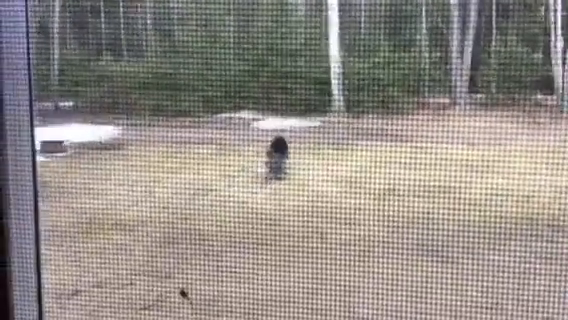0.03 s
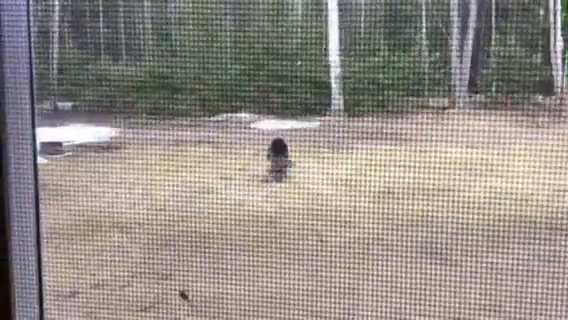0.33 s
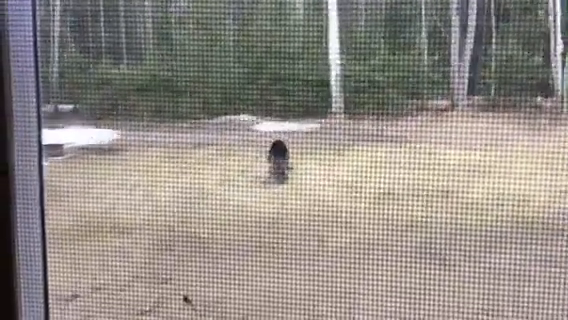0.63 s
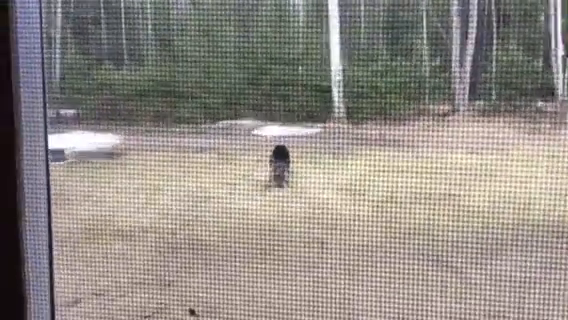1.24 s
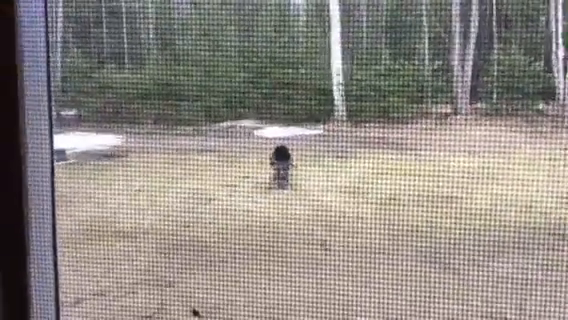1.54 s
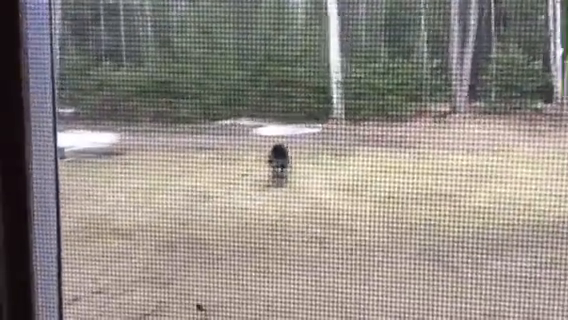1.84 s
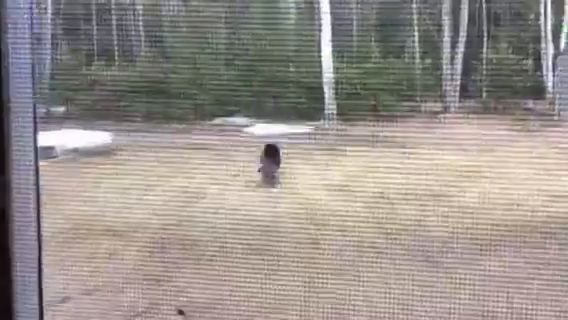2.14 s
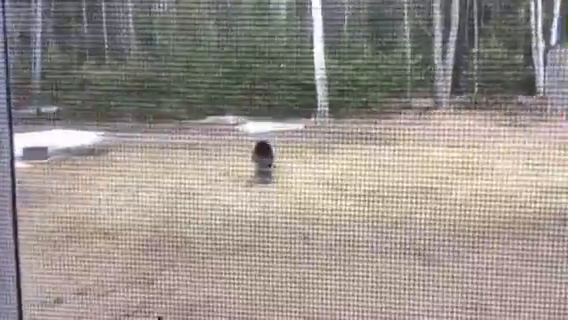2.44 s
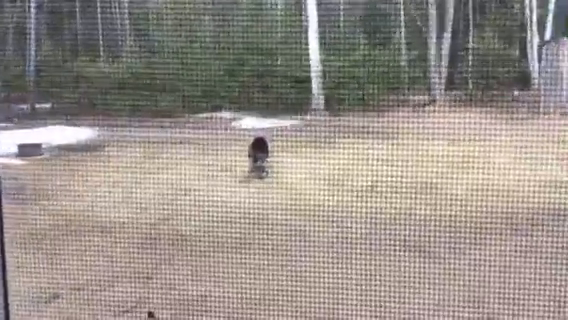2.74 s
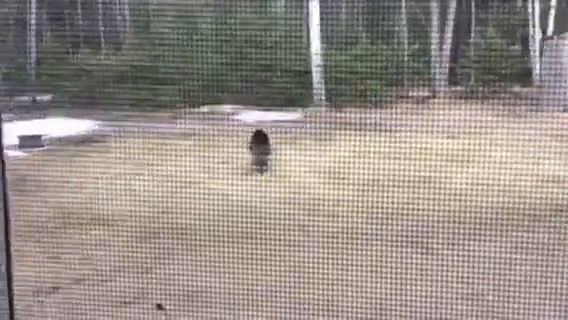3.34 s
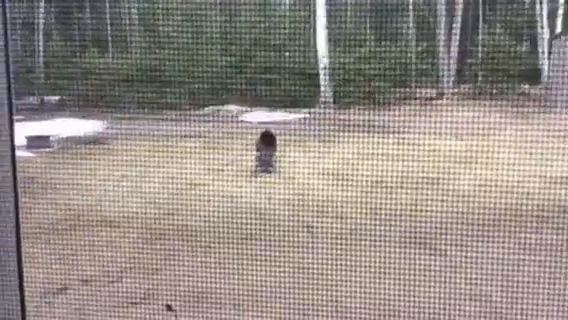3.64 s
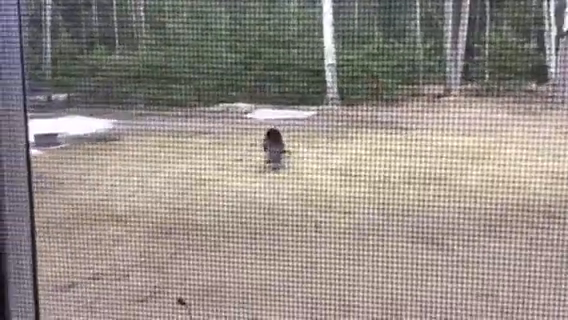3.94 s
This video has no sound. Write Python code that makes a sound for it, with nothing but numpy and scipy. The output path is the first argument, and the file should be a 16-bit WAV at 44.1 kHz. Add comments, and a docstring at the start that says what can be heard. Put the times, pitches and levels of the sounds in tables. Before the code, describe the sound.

A hollow wooden knock with a soft, rebounding thump sounds once, close by, in a quiet room. Before and after it, faint rubs, taps and plastic clicks from a hand-held microphone dot a steady appliance hum and low rumble.

```python
"""A quiet room, heard from a hand-held camera at a window screen. Throughout, an appliance hums
on the mains over low rumble, air and faint hiss. First the hand rubs on its grip, with a soft tap,
light ticks and clicks of hard plastic that ring briefly in the room. At 1.2 s something close by
is bumped: a hollow wooden knock, then a soft thump that rebounds. Afterwards a faint whirr swells
three times among more clicks and ticks, and the rubs and a tap return."""
import sys
import numpy as np
from scipy import signal
from scipy.fft import rfft, irfft, next_fast_len
from scipy.io import wavfile
from scipy.ndimage import map_coordinates

SR = 44100
rng = np.random.default_rng(int(sys.argv[2]) if len(sys.argv) > 2 else 0)


def generate_wav(signal):
    """Clip the signal to [-1, 1] and save it as 16-bit WAV at the path in sys.argv[1]."""
    frames = np.transpose(np.atleast_2d(signal))
    scaled = np.clip(frames, -1, 1) * 32767
    pcm = np.round(scaled).astype(np.int16)
    wavfile.write(sys.argv[1], SR, pcm)


N = 176400


def amp(db):
    """Decibels to gain."""
    return 10 ** (np.asarray(db) / 20)


def unit_rms(x):
    """Scale to rms 1."""
    return x / np.sqrt(np.mean(x ** 2) + 1e-20)


def log_interp(points, hz):
    """Interpolate (freq_hz, value) points on a log frequency axis."""
    freq_hz, values = np.transpose(points)
    return np.interp(np.log(hz + 1), np.log(freq_hz + 1), values)


def wobble(rate_hz):
    """Smooth random curve with knots at rate_hz."""
    knots = rng.standard_normal(int(N * rate_hz / SR) + 4)
    return map_coordinates(knots, [np.arange(N) * rate_hz / SR])


def gain_curve(points):
    """Gain per sample from (time_s, level_db) points."""
    return amp(np.interp(np.arange(N) / SR, *np.transpose(points)))


def swells(rows):
    """Gain per sample of Gaussian swells."""
    t = np.arange(N) / SR
    return sum(amp(db) * np.exp(-.5 * ((t - centre_s) / sigma_s) ** 2) for centre_s, sigma_s, db in rows)


def filtered(x, response):
    """Apply a zero-phase frequency response."""
    size = next_fast_len(N + SR // 2)
    return irfft(rfft(x, size) * response(np.fft.rfftfreq(size, 1 / SR)), size)[:N]


def noise(spectrum):
    """Coloured noise, rms 1."""
    return unit_rms(filtered(rng.standard_normal(N), lambda hz: amp(log_interp(spectrum, hz))))


def body_response(spectrum, size=4096):
    """Minimum-phase impulse response with this spectrum, energy 1."""
    cepstrum = irfft(np.log(amp(log_interp(spectrum, np.fft.rfftfreq(size, 1 / SR)))))
    cepstrum[1:size // 2] *= 2
    cepstrum[size // 2 + 1:] = 0
    response = irfft(np.exp(rfft(cepstrum)))
    return response / np.linalg.norm(response)


def add(track, start_s, sound):
    """Mix a sound in at start_s."""
    part = track[round(start_s * SR):][:len(sound)]
    part += sound[:len(part)]


# freq_hz, t60_s
ROOM_DECAY = [(150, 0.66), (1000, 0.36), (2000, 0.6), (5000, 0.36), (14000, 0.3)]
def room_tail(build_s=0.0013):
    """Random room echo, energy 1; the top treble dies first."""
    hz, t, bins = signal.stft(rng.standard_normal(SR // 2), SR, nperseg=256)
    decay = amp(-60 * t / log_interp(ROOM_DECAY, hz)[:, None])
    tail = signal.istft(bins * decay * (1 - np.exp(-t / build_s)), SR, nperseg=256)[1]
    return tail / np.linalg.norm(tail)


def contacts(rows, spectrum, contact_s, room_db, clean_share=0, rise_s=0.00026):
    """Brief pushes, part clean blow and part grit, ring the body and then the room."""
    out, t = np.zeros(N), np.arange(SR // 20) / SR
    body = body_response(spectrum)
    for start_s, level_db, *_ in rows:
        grit = rng.standard_normal(len(t)) * np.exp(-t / contact_s) * (1 - np.exp(-t / rise_s))
        push = np.sqrt(clean_share) * (t == 0) + np.sqrt(1 - clean_share) * grit / np.linalg.norm(grit)
        direct = signal.fftconvolve(push, body)
        echo = signal.fftconvolve(room_tail(), body)
        gain = amp(level_db) * np.sqrt(SR * .002)  # energy of 2 ms at level_db
        add(out, start_s, gain * direct / np.linalg.norm(direct))
        add(out, start_s, gain * amp(room_db) * echo)
    return out


def ringing(rows, modes, rise_s=0.00069):
    """Each blow excites the decaying modes of the struck part."""
    out, t = np.zeros(N), np.arange(SR // 2) / SR
    for start_s, _, ring_db in rows:
        tones = np.zeros(len(t))
        for hz, db, t60_s in modes:
            decay = amp(db + rng.normal(0, 1) - 60 * t / t60_s)
            tones += decay * np.sin(2 * np.pi * (hz * t + rng.random()))
        add(out, start_s, amp(ring_db) * tones * (1 - np.exp(-t / rise_s)))
    return out


# freq_hz, rms_db
HUM_LINES = [(57.2, -69), (99.6, -65.5), (120.0, -53), (141.2, -74), (839.6, -89.5), (959.6, -91.5),
             (1109, -91), (1428.8, -94)]
def appliance_hum(waver_db=1.5, drift_rad=0.12):
    """Motor and mains lines, slightly unsteady in level and phase."""
    out, t = np.zeros(N), np.arange(N) / SR
    for hz, rms_db in HUM_LINES:
        peak = np.sqrt(2) * amp(rms_db + waver_db * wobble(2.5))
        phase_rad = 2 * np.pi * (hz * t + rng.random()) + drift_rad * wobble(4.5)
        out += peak * np.sin(phase_rad)
    return out


# freq_hz, density_db
LOW_RUMBLE_SPECTRUM = [(20, -32.5), (41, -20.5), (54, -6.5), (80, -4.5), (125, -4.5), (165, -1.8),
                       (215, -12), (260, -23), (520, -48.5), (1200, -62)]
UPPER_RUMBLE_SPECTRUM = [(90, -25), (170, 2.5), (210, 1.5), (260, -7), (350, -12), (520, -23),
                         (1200, -54.5)]
# time_s, level_db
UPPER_RUMBLE_LEVELS = [(0, -63), (.6, -60.5), (1.7, -62.5), (2.3, -65), (2.8, -63), (3.3, -59), (4, -64)]
def rumble(low_db=-59.5, swing_db=2.3):
    """Two bands of low noise: the lower wavers, the upper drifts slowly in level."""
    low = amp(low_db + swing_db * wobble(4.2)) * noise(LOW_RUMBLE_SPECTRUM)
    upper = gain_curve(UPPER_RUMBLE_LEVELS) * noise(UPPER_RUMBLE_SPECTRUM)
    return low + upper


# freq_hz, density_db
AIR_SPECTRUM = [(300, -4), (550, 0.5), (750, 3.5), (950, 1.5), (1120, 2), (1300, 0), (1600, -4),
                (2300, -10), (5000, -32)]
# time_s, level_db
AIR_LEVELS = [(0, -73), (.22, -75), (.34, -73), (.5, -74.5), (1.84, -74.5), (2.35, -76), (2.64, -73.7),
              (2.9, -74.5), (3.2, -73.5), (3.45, -75.5), (4, -75)]
def air(flutter_db=1.54):
    """Midrange air noise that swells gently and flutters."""
    return gain_curve(AIR_LEVELS) * amp(flutter_db * wobble(25.2)) * noise(AIR_SPECTRUM)


# freq_hz, density_db
HISS_SPECTRUM = [(500, -5.5), (2000, 1.5), (3600, -1), (4900, -3.5), (5700, -4.5), (6450, -4.5), (7000, -7),
                 (7700, -8.5), (11000, -8.5), (13500, -19), (15600, -29)]
def hiss(level_db=-77, swing_db=0.07):
    """Smooth microphone hiss."""
    return amp(level_db + swing_db * wobble(13)) * noise(HISS_SPECTRUM)


# centre_s, sigma_s, rms_db
RUB_SWELLS = [(0.037, 0.013, -77), (0.253, .015, -78), (.33, 0.028, -84), (3.14, 0.014, -83),
              (3.297, 0.052, -83)]
# freq_hz, density_db
RUB_SPECTRUM = [(1200, -13), (2700, -1), (4200, 3), (6000, -2), (8000, -17), (14000, -28)]
def grip_rubs(grain_db=5.0):
    """The hand shifts its grip: short, grainy swells of friction."""
    friction = amp(grain_db * wobble(150)) * noise(RUB_SPECTRUM)
    return swells(RUB_SWELLS) * unit_rms(friction)


# start_s, level_db, pitch_ratio
TAP_HITS = [(0.2949, -57.5, 0.97), (3.194, -59.5, 0.704)]
# freq_hz, gain_db
TAP_BODY = [(400, -19), (720, -6.5), (900, -17), (1100, 1.5), (1270, -8.5), (1460, 2), (1700, -14.5),
            (4000, -32), (15000, -59)]
def soft_taps():
    """Dull taps, deeper or higher with the spot touched."""
    out = np.zeros(N)
    for start_s, level_db, pitch_ratio in TAP_HITS:
        body = [(hz * pitch_ratio, db) for hz, db in TAP_BODY]
        out += contacts([(start_s, level_db)], body, contact_s=0.005, room_db=-2.5, rise_s=0.0034)
    return out


# start_s, level_db, ring_db
TICK_HITS = [(.297, -75, -81), (1.7305, -63, -72), (1.755, -69, -77), (1.80, -71, -81)]
# freq_hz, gain_db
TICK_BODY = [(1500, -39), (3100, -12), (3650, -3), (4100, -6), (5300, -6), (5850, -7), (6450, -5.5),
             (7300, -9), (8300, -11), (10000, -12), (12000, -12), (15500, -29)]
# freq_hz, gain_db, t60_s
TICK_RING = [(5350, -2, .12), (5800, -6, 0.089), (6340, -1.5, 0.14)]
def light_ticks():
    """Light contacts on a small part that rings in the treble."""
    return contacts(TICK_HITS, TICK_BODY, contact_s=0.0082, room_db=3) + ringing(TICK_HITS, TICK_RING)


# start_s, level_db
FINE_TICK_HITS = [(.519, -74), (3.630, -72.5), (3.648, -77)]
# freq_hz, gain_db
FINE_TICK_BODY = [(4000, -50), (8500, -16), (10500, 5), (12500, -4), (15500, -11)]
def fine_ticks():
    """Tiny, very high contacts with little echo."""
    return contacts(FINE_TICK_HITS, FINE_TICK_BODY, contact_s=.009, room_db=-9, rise_s=.003)


# start_s, level_db, ring_db
CLICK_HITS = [(.790, -58.5, -62), (.820, -68, -66), (1.349, -62.5, -69), (1.376, -66, -79),
              (2.2935, -58.5, -69.5), (2.3235, -68.5, -62), (2.436, -67, -77)]
# freq_hz, gain_db
PLASTIC_BODY = [(500, -42), (1350, -15.5), (1580, 0), (1740, -3.5), (1900, -13), (2150, -2.5),
                (2500, -15.5), (2900, -8), (3400, -16), (4350, -8), (5200, -28), (7000, -22.5),
                (11000, -28), (15500, -51)]
# freq_hz, gain_db, t60_s
PLASTIC_MODES = [(1650, -8, 0.077), (1750, -1.5, 0.089)]
def plastic_clicks():
    """A hard plastic part clicks and rings briefly."""
    clicks = contacts(CLICK_HITS, PLASTIC_BODY, contact_s=0.0062, room_db=-1.1)
    return clicks + ringing(CLICK_HITS, PLASTIC_MODES)


# start_s, level_db, ring_db
KNOCK_HITS = [(1.2096, -44, -73), (1.2144, -38.5, -59), (1.2430, -52.5, -71)]
# start_s, level_db
SNAP_HITS = [(1.2112, -61), (1.237, -63), (1.345, -65.5)]
# freq_hz, gain_db
WOOD_BODY = [(200, -1.5), (320, 4.5), (400, -1), (530, -20.5), (690, 5.5), (830, -3), (950, 6.5),
             (1050, 5.5), (1210, -4.5), (1350, -1.5), (1515, 5), (1660, -7.5), (1930, -2), (2200, -15.5),
             (2450, -29), (2900, -17), (3850, -14.5), (4800, -30), (5600, -24), (7500, -36), (12000, -34),
             (15500, -46)]
EDGE_BODY = [(1000, -4), (2400, 12.5), (4400, -6), (5500, 7), (8500, -4), (11500, -2), (15500, -16)]
# freq_hz, gain_db, t60_s
WOOD_MODES = [(714, 2, 0.2), (744, -1, 0.31), (922, -5, 0.34), (950, 3, 0.27), (983, .5, .38),
              (1113, 8, 0.25), (1560, -1, 0.23), (1593, -11, 0.37)]
def hollow_knock():
    """Hollow wood is struck and rings on; its hard edge snaps on landing and rebound."""
    blows = contacts(KNOCK_HITS, WOOD_BODY, contact_s=0.0046, room_db=0.5, clean_share=0.44)
    ring = ringing(KNOCK_HITS, WOOD_MODES)
    snaps = contacts(SNAP_HITS, EDGE_BODY, contact_s=0.0062, room_db=1.5, rise_s=.008)
    return blows + ring + snaps


# start_s, peak_db, pitch_hz
THUMP_HITS = [(1.241, -28, 158.7), (1.2705, -37, 151), (1.2863, -39, 128.5)]
# freq_hz, density_db
SHUDDER_SPECTRUM = [(30, -25), (66, 6), (100, -6.5), (128, 6.5), (185, -9.5), (250, -7.5), (320, -8),
                    (380, -20), (470, -25), (900, -52), (3000, -100)]
def soft_thump(rise_s=.012, sharpness=2.55, shudder_db=-44, shudder_t60_s=0.51, shudder_rise_s=0.0029):
    """A padded blow swells and fades in a few low cycles, rebounds and shakes its surroundings."""
    out, t = np.zeros(N), np.arange(SR // 2) / SR
    envelope = (t / rise_s * np.exp(1 - t / rise_s)) ** sharpness
    for start_s, peak_db, pitch_hz in THUMP_HITS:
        add(out, start_s, -amp(peak_db) * envelope * np.sin(2 * np.pi * pitch_hz * t))
    shudder_gain = amp(shudder_db - 60 * t / shudder_t60_s) * (1 - np.exp(-t / shudder_rise_s))
    add(out, THUMP_HITS[0][0], shudder_gain * noise(SHUDDER_SPECTRUM)[:len(t)])
    return out


# centre_s, sigma_s, rms_db
WHIRR_SWELLS = [(1.85, .06, -76.5), (2.66, .05, -77), (3.3, .045, -75.5)]
# freq_hz, density_db
WHIRR_SPECTRUM = [(650, -23), (950, -8), (1115, 6), (1300, -5), (1800, -27)]
def whirr():
    """Faint, narrow midrange noise that comes and goes."""
    return swells(WHIRR_SWELLS) * noise(WHIRR_SPECTRUM)


def scene():
    """Small contacts, one bump and a whirr over the background, mono."""
    background = appliance_hum() + rumble() + air() + hiss()
    small_contacts = grip_rubs() + soft_taps() + light_ticks() + fine_ticks() + plastic_clicks()
    bump = hollow_knock() + soft_thump()
    return (background + small_contacts + bump + whirr())[None]


def record(dry, cutoff_hz=15700):
    """Brick-wall low-pass at the camera's band limit."""
    return filtered(dry[0], lambda hz: hz < cutoff_hz)[None]


dry = scene()
out = record(dry)
generate_wav(out)
```